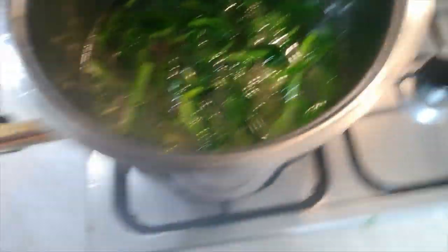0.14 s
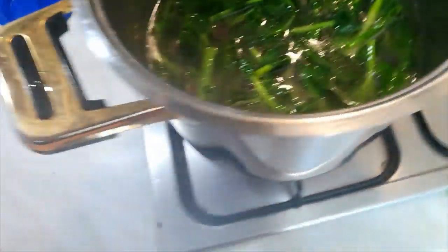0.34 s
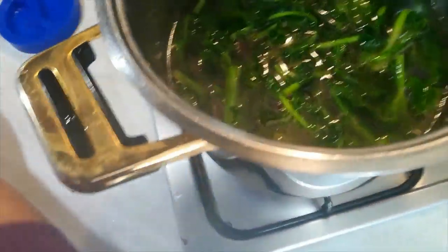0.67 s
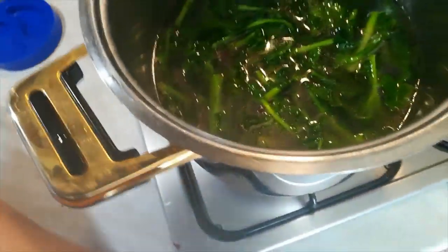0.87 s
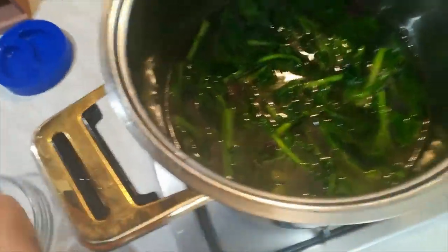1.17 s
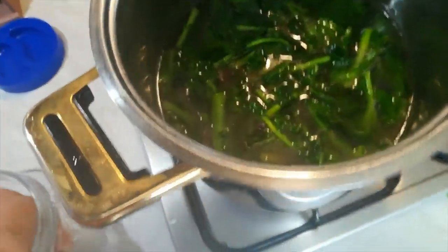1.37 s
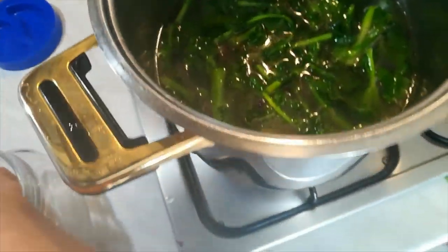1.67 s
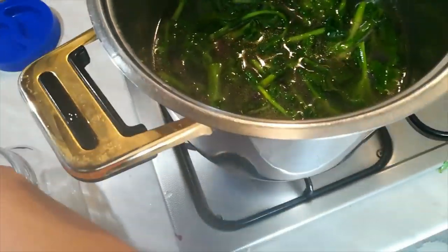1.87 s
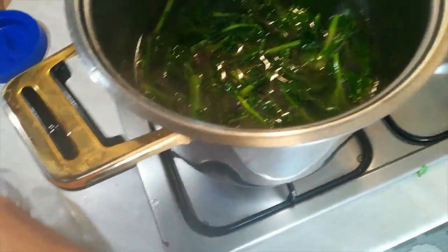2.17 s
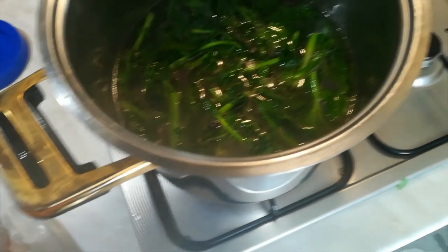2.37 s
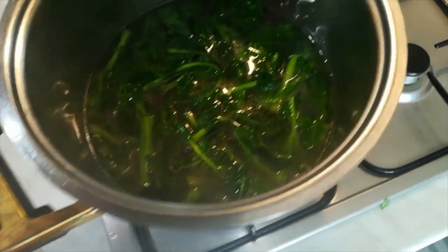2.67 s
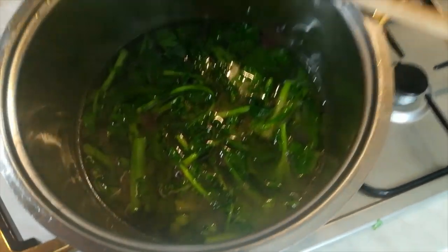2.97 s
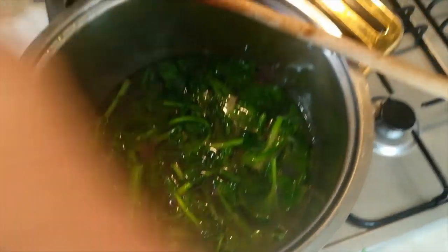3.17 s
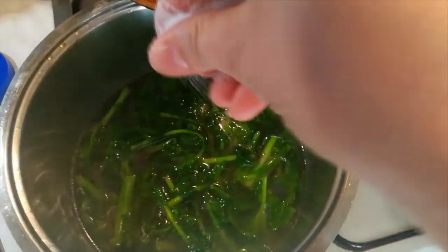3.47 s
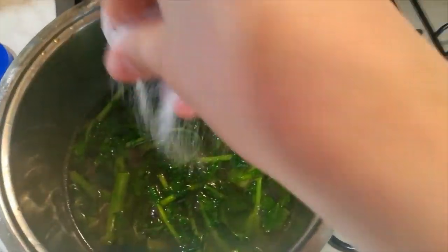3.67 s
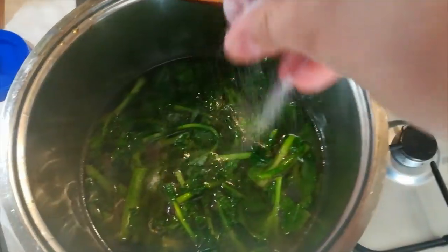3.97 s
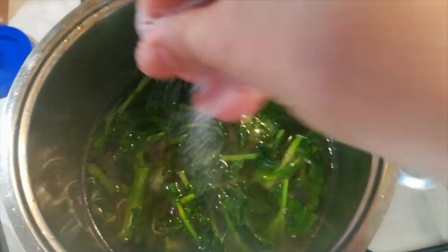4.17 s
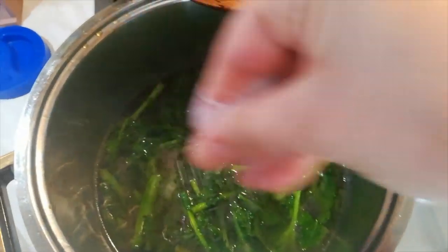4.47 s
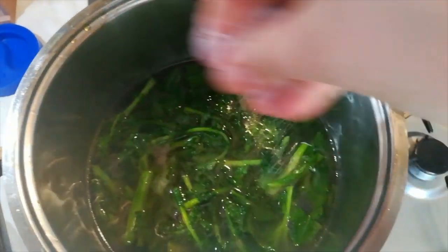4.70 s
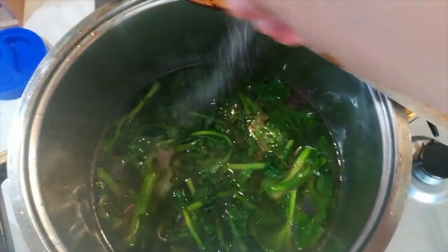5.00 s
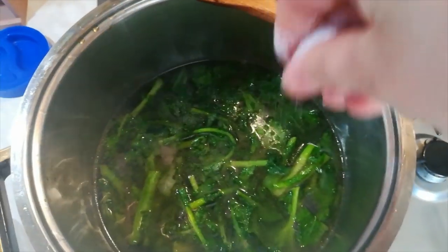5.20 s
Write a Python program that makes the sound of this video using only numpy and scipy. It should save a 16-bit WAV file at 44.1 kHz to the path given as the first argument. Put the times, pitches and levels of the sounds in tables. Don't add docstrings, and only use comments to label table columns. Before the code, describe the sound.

A quiet, small kitchen recorded close in stereo, with faint hiss and low rumble from the hand holding the camera. Near sounds come mostly from the left. Around 0.15 s, light finger ticks lead into a sharp double lid snap at 0.18 s, a short rattle and a bright, thin scrape until about 0.45. A jar bumps at 0.66, then strikes hard in a cluster at 0.75-0.84, with hollow cabinet resonance, and grates along the worktop until 1.2. Softer bumps from 1.23 to 1.36 precede another loud knock at 1.44, then small settling taps to 1.85. From 1.7 to 2.3, fingers dig faintly through salt, crisp and ringing slightly in the jar. Near silence follows until about 3.25. Then short, uneven strokes of dry, gritty hiss run to the end at 5.4, salt rubbed between fingertips, sprinkled with tiny clicks and cracking crystals, far quieter than the knocks.

```python
import sys
import numpy as np
from scipy import signal
from scipy.fft import rfft, irfft, next_fast_len
from scipy.io import wavfile
from scipy.ndimage import uniform_filter1d

SR = 44100
rng = np.random.default_rng(int(sys.argv[2]) if len(sys.argv) > 2 else 0)


def unload_audio(sound):
    columns = np.transpose(np.atleast_2d(sound))
    steps = np.round(np.clip(columns, -1, 1) * 32767)
    wavfile.write(sys.argv[1], SR, steps.astype(np.int16))


def level_to_linear(level):
    exponent = np.asarray(level, float) / 20
    return 10 ** exponent


N = 235670


def unit(x):
    return x / np.sqrt(np.mean(x ** 2) + 1e-20)


def peak(x):
    return x / np.abs(x).max()


def along(points, hz):
    f, v = np.transpose(points)
    return np.interp(np.log(hz + 1), np.log(f + 1), v)


def curve(rows):
    return np.interp(np.arange(N) / SR, *np.transpose(rows))


def bumps(peaks, hz):
    return sum(db / (1 + (2 * (hz - center) / width) ** 2) for center, width, db in peaks)


def filtered(x, response):
    m = next_fast_len(N + SR // 4, real=True)
    return irfft(rfft(x, m) * response(np.fft.rfftfreq(m, 1 / SR)), m)[..., :N]


def soft(x, edge_hz):
    return signal.sosfilt(signal.butter(3, edge_hz, fs=SR, output="sos"), x)


def struck(x, colour):
    m = next_fast_len(2 * len(x))
    cep = irfft(np.log(level_to_linear(colour(np.fft.rfftfreq(m, 1 / SR))) + 1e-4), m)
    cep[1:m // 2] *= 2
    cep[m // 2 + 1:] = 0
    return irfft(rfft(x, m) * np.exp(rfft(cep)), m)[:len(x)]


def add(track, s, sound):
    at = round(s * SR)
    track[:, at:at + sound.shape[1]] += sound[:, :N - at]


def patchy(depth_db, cavity_hz=None, cavity_db=0):
    hz, t, z = signal.stft(rng.standard_normal((2, N)), SR, nperseg=512)
    field = uniform_filter1d(rng.standard_normal(z.shape[1:]), size=3, axis=0)
    field = uniform_filter1d(field, size=12, axis=1)
    gain_db = depth_db * unit(field)
    if cavity_hz is not None:
        now = np.minimum(t * SR, N - 1).astype(int)
        cavity_width_hz = 700
        gain_db = gain_db + bumps([(cavity_hz[now], cavity_width_hz, cavity_db[now])], hz[:, None])
    return signal.istft(z * level_to_linear(gain_db), SR, nperseg=512)[1][:, :N]


GRIP = {"lid": (2000, 290), "drag": (440, 650), "scoop": (670, 230), "rub": (590, 380), "stir": (150, 830)}


def strokes(rows, action):
    start, length, db, body_db, swell_db = np.transpose(rows)[..., None]
    rise, fall = GRIP[action]
    t = np.arange(0, N + 64, 64) / SR
    shape_db = db + swell_db * (np.clip((t - start) / length, 0, 1) - .5)
    shape_db = shape_db - rise * np.maximum(start - t, 0)
    shape_db = shape_db - fall * np.maximum(t - start - length, 0)

    def total(levels_db):
        power = np.sum(level_to_linear(2 * levels_db), axis=0)
        return np.interp(np.arange(N) / SR, t, 10 * np.log10(power + 1e-14))
    return total(shape_db + body_db), total(shape_db)


# (start [s], length [s], level [dB], body over level [dB], swell [dB])
STIR = [
    (0, 5.4, -66, 0, -2.5),
    (.73, 0.081, -46.5, 0, 6.5),
    (1.25, 0.24, -50.5, 0, 4.5),
    (1.6, .5, -60, 0, -3.5),
    (3.8, 0.28, -62, 0, 1),
]
# (frequency [Hz], density [dB per Hz])
AIR = [(12, -62), (30, -13.5), (60, -12), (107, -11.5), (216, -21), (410, -12.5), (590, -18.5), (642, -23),
       (759, -16.5), (1060, -20), (2080, -19.5), (2670, -21), (5850, -25.5), (6720, -27), (7520, -26.5),
       (16000, -36)]
# (frequency [Hz], likeness [-1 to 1])
AIR_ALIKE = [(60, 0.84), (110, 0.98), (200, 0.54), (380, -0.028), (700, -0.49), (1290, 0.49), (2380, -0.33),
             (4400, 0.31), (8120, 0.01), (15000, 0.35)]


def air():
    def spread(f):
        angle = np.arccos(along(AIR_ALIKE, f)) / 2
        return level_to_linear(along(AIR, f)) * np.array([np.cos(angle), np.sin(angle)])

    def layer(level_db, depth_db, band):
        mid, side = filtered(patchy(depth_db), lambda f: band(f) * spread(f))
        return level_to_linear(level_db) * np.array([mid + side, mid - side]) / np.std(mid)
    rumble = layer(strokes(STIR, "stir")[1] - 7, 2.8, lambda f: f < 300)
    hiss = layer(-72.5, 1.3, lambda f: f >= 300)
    return rumble + hiss


# (frequency [Hz], t60 [s])
KITCHEN = [(100, 0.65), (500, 0.38), (2000, 0.1), (8000, 0.067), (16000, 0.08)]


def room(x, wet_db):
    hz, t, z = signal.stft(rng.standard_normal((2, len(x))), SR, nperseg=256)
    tail = signal.istft(z * level_to_linear(-60 * t / along(KITCHEN, hz)[:, None]), SR, nperseg=256)[1]
    wet = signal.fftconvolve(x[None], tail / np.linalg.norm(tail[0]), axes=1)[:, :len(x)]
    fade = np.minimum(1, np.linspace(8, 0, len(x)))
    return x + level_to_linear(wet_db) * wet * fade


# (frequency [Hz], difference [dB])
SHADOW = [(60, -7), (110, -19), (200, 20), (380, 10), (700, 11), (1290, 6.5), (2380, 21.5), (4400, 7.5),
          (8120, 5.5), (15000, 31.5)]
# (frequency [Hz], difference [dB])
KNOCK_SHADOW = [(60, -12), (110, 2), (200, -2.5), (380, -0.5), (700, 5.5), (1290, 10), (2380, 12),
                (4400, 1.5), (8120, 3.5), (15000, 16)]
# (frequency [Hz], likeness [0 to 1])
ALIKE = [(100, 0.51), (500, 0.84), (2000, 0.11), (5000, 0.077), (12000, 0.084)]
# (delay [s], gain [factor])
DETOURS = [(.00011, 1), (.00034, -.6), (.00073, .5), (.0013, -.35)]


def ports(pair, shadow, colour_db=lambda f: 0):
    lag_s = 27 / 44100
    delays, gains = np.transpose(DETOURS)

    def paths(f):
        half, like = level_to_linear(along(shadow, f) / 2), along(ALIKE, f)
        around = unit(gains) @ np.exp(-2j * np.pi * np.outer(delays, f)) / np.sqrt(len(DETOURS))
        direct = like / half * np.exp(-2j * np.pi * f * lag_s)
        return level_to_linear(colour_db(f)) * np.array([half, direct, np.sqrt(1 - like ** 2) / half * around])
    left, late, scatter = filtered(pair[[0, 0, 1]], paths)
    return np.array([left, late + scatter])


# (time [s], peak level [dB], frequency
# [Hz], t60 [s])
PANEL_NOTES = [(.79, -26, 222, .27), (.805, -20, 290, .04), (.785, -25, 877, .12), (1.455, -29, 830, .1),
               (1.326, -35, 152, .5), (1.794, -37, 1000, .06), (1.328, -26.5, 454, .2),
               (1.333, -31, 280, .1), (1.44, -19.5, 380, .16), (.663, -34, 235, .12), (.663, -38, 640, .08),
               (5.02, -67, 420, .2), (1.795, -39, 403, .15), (4.095, -64.5, 291, .38), (5.27, -67, 480, .2)]


def panels():
    track, t = np.zeros((2, N)), np.arange(SR // 2) / SR
    for s, db, hz, t60 in PANEL_NOTES:
        boom = level_to_linear(db - 60 * t / t60) * (1 - np.exp(-t / 0.0024)) * np.sin(2 * np.pi * hz * t)
        add(track, s, np.array([boom, boom]))
    return ports(track, KNOCK_SHADOW)


# (frequency [Hz], level [dB], t60 [s])
CABINET = [(151, 0, .8), (220, -5, .3), (381, -5, .12), (432, -3, .14), (476, -1, .2)]


def cabinet_thud(longest):
    t = np.arange(SR // 2) / SR
    thud = 0
    for hz, db, t60 in CABINET:
        strength_db = db + 1.5 * rng.standard_normal()
        thud = thud + level_to_linear(strength_db - 60 * t / min(t60, longest)) * np.sin(2 * np.pi * hz * t)
    return peak(soft(thud, 700))


def knocks(blows, tone, chatter_db):
    track, t = np.zeros((2, N)), np.arange(SR // 3) / SR
    for s, db, chatter_s, thud_db, thud_t60 in blows:
        contacts = rng.standard_normal(len(t)) * (rng.random(len(t)) < .12)
        fall_db = chatter_db - 60 * (t / chatter_s) ** 2.4
        blow = level_to_linear(fall_db) * (contacts + 0.76 * soft(contacts, 2200))
        blow[0] = 3
        add(track, s, level_to_linear(db) * room(peak(struck(blow, lambda f: tone(db, f))), wet_db=-8))
        thud = cabinet_thud(thud_t60)
        add(track, s, level_to_linear(db + thud_db) * np.array([thud, thud]))
    return ports(track, KNOCK_SHADOW)


# (time [s], peak level [dB], chatter end [s], cabinet level [dB], cabinet t60 [s])
LID_TICKS = [
    (.1405, -48.5, 0.018, -35, 0.09),
    (.1525, -44.5, .02, -46.5, .1),
]
# (time [s], peak level [dB], chatter end [s], cabinet level [dB], cabinet t60 [s])
LID_SNAPS = [
    (.1833, -12, 0.0053, -38.5, 0.2),
    (.1843, -11.5, 0.0072, -43, .2),
    (.189, -26.5, .035, -38, 0.11),
    (.215, -31.5, 0.026, -36, .1),
]
# (frequency [Hz], density [dB per Hz])
TICK_TONE = [(500, -41), (1200, -9.5), (1900, 8.5), (3000, -18.5), (9000, -41)]
# (frequency [Hz], density [dB per Hz])
SNAP_TONE = [(180, -56), (300, -23), (685, -36.5), (1000, -14), (1510, -14), (1900, -1), (3280, -9),
             (7000, -12), (8200, -5.5), (8840, -12), (15500, -33.5)]


def lid_snaps():
    ticks = knocks(LID_TICKS, lambda db, f: along(TICK_TONE, f), chatter_db=-7)
    snaps = knocks(LID_SNAPS, lambda db, f: along(SNAP_TONE, f), chatter_db=3)
    return ticks + snaps


# (frequency [Hz], density [dB per Hz])
SOFT_TONE = [(53, -34), (90, -12), (440, -2), (760, -5), (1600, -12.5), (2200, -17.5), (3300, -35),
             (7500, -36), (12000, -73.5), (18000, -120)]
# (frequency [Hz], density [dB per Hz])
HARD_TONE = [(53, -33), (90, -6), (500, -11.5), (1000, -2.5), (2500, -14), (3300, -25.5), (4150, -22.5),
             (5250, -37), (7800, -35.5), (14000, -66)]
# (frequency [Hz], width [Hz], level [dB])
BOARD = [(237.6, 20, 1.5), (385.6, 18, 8.5), (455.5, 24, 4), (623, 46, -7.5), (776, 60, 4.5), (916, 210, 3),
         (1135, 100, -6), (1266, 52, 0), (1403, 60, -9), (1630, 100, -3.5), (2130, 60, 10), (2400, 23, 6.5),
         (3430, 170, 5.5), (4100, 100, 11.5)]


def jar_tone(db, hz):
    soft_db, hard_db = -27, -14
    hard = np.clip((db - soft_db) / (hard_db - soft_db), 0, 1)
    return (1 - hard) * along(SOFT_TONE, hz) + hard * along(HARD_TONE, hz) + bumps(BOARD, hz)


# (time [s], peak level [dB], chatter end [s], cabinet level [dB], cabinet t60 [s])
JAR_KNOCKS = [(.646, -56, 0.013, 17.5, 0.085), (.6618, -24.5, 0.04, -9.5, 0.15),
              (.672, -28.5, .04, -14.5, .1), (.746, -27, 0.044, -10.5, .1), (.776, -8, 0.019, -9.5, 0.11),
              (.7838, -11.5, .025, -22, .1), (.7945, -16.5, .02, -20.5, .1), (.799, -12, 0.032, -17, 0.21),
              (.836, -22.5, .03, -19, .1), (1.231, -38, 0.015, 5, 0.39), (1.239, -36, 0.023, -5.5, 0.12),
              (1.2435, -35, 0.07, 6, 1), (1.255, -35, 0.047, -2.5, 0.27), (1.3245, -23.5, 0.07, 1.5, 0.47),
              (1.357, -33.5, .07, -5.5, .2), (1.4355, -7.5, 0.02, -20, 0.48),
              (1.4455, -13.5, 0.02, -9, 0.05), (1.456, -24, 0.028, -8, 0.075), (1.501, -32, .04, -9.5, .1),
              (1.6, -40.5, 0.094, 7.5, 0.14), (1.7918, -27.5, 0.045, -7, 0.28), (1.843, -44, .04, 4, .1)]


def jar_knocks():
    return knocks(JAR_KNOCKS, jar_tone, chatter_db=-7)


def friction(levels, hollow, tone, peaks, shadow, per_s, spread_db, patchy_db, cavity_db):
    out, cavity_hz = 0, curve(hollow)
    body_db, hiss_db = levels
    ring_db = cavity_db + 0.3 * np.maximum(hiss_db - body_db, 0)
    for level_db, colour in zip(levels, tone):
        sizes = np.minimum(rng.standard_exponential(N), 3)
        grains = (rng.random(N) < per_s / SR) * level_to_linear(spread_db * sizes)
        clumps = uniform_filter1d(grains, size=24)
        pair = patchy(patchy_db, cavity_hz, ring_db) * np.sqrt(1 + np.abs(clumps) / np.mean(clumps))
        sound = ports(pair, shadow, lambda f: along(colour, f) + bumps(peaks, f))
        out = out + level_to_linear(level_db) * sound / np.std(sound.mean(axis=0))
    return out


# (start [s], length [s], hiss level [dB], body over hiss [dB], swell [dB])
LID = [
    (0, 0.0095, -71.5, 6.5, -0.5),
    (.152, 0.028, -66, 13.5, 6),
    (.19, 0.052, -44.5, 2, -5),
    (.27, 0.17, -50, -1, -2),
    (.5, 0.14, -68, 2.5, 0.5),
]
# (time [s], cavity frequency [Hz])
LID_HOLLOW = [(.1, 4320), (.25, 5100), (.4, 6290), (.59, 4660)]
# (frequency [Hz], density [dB per Hz])
LID_TONE = [
    [(120, -55), (200, -23), (404, -15.5), (628, -20), (1080, -11), (1330, -16.5), (2230, -9.5), (3000, -25.5), (3900, -43), (6600, -120)],
    [(1650, -34), (2800, 0), (4340, 4), (5480, 1), (6620, -0.5), (7890, 2.5), (14900, -20.5), (16000, -37)],
]


def lid_sliding():
    return friction(strokes(LID, "lid"), LID_HOLLOW, LID_TONE, [], KNOCK_SHADOW,
                    per_s=14000, spread_db=0.5, patchy_db=1.44, cavity_db=2.0)


# (start [s], length [s], hiss level [dB], body over hiss [dB], swell [dB])
DRAG = [(.715, .03, -62, 13.7, 6.5), (.745, 0.045, -47.5, 6.3, 3), (.81, 0.07, -48, 9.2, 1),
        (.905, .19, -44.5, 2.3, -2.5), (1.11, 0.095, -49, 3.2, -6.5), (1.21, 0.09, -66.5, 11, -11.5),
        (1.335, 0.059, -69.5, 12, -10.5), (1.44, 0.068, -62, 16, 0.5), (1.52, 0.15, -76.5, 18.8, -19.5)]
# (time [s], cavity frequency [Hz])
DRAG_HOLLOW = [(.7, 7145), (1.2, 7130)]
# (frequency [Hz], density [dB per Hz])
DRAG_TONE = [
    [(41, -63), (70, -22), (224, 1), (643, 1.5), (706, 13.5), (880, -3), (1030, 5), (1110, -3), (2300, -1.5), (3000, -16.5), (3900, -31.5), (6600, -120)],
    [(1650, -42), (2800, -16), (3800, -10), (4120, -12.5), (5240, -15), (6570, -15), (7490, -10), (9960, -21), (14800, -35.5), (16000, -37)],
]
# (frequency [Hz], width [Hz], level [dB])
JAR = [(153, 22, 16.5), (222.4, 16, 7.5), (406, 29, 3.5), (430, 20, 6.5), (610, 160, -6), (4100, 84, 12.5),
       (4500, 140, 7.5), (7656, 440, 0), (8985, 100, -3.5)]


def jar_dragging():
    return friction(strokes(DRAG, "drag"), DRAG_HOLLOW, DRAG_TONE, JAR, KNOCK_SHADOW,
                    per_s=13000, spread_db=-13.5, patchy_db=1.83, cavity_db=4.5)


# (start [s], length [s], hiss level [dB], body over hiss [dB], swell [dB])
SCOOP = [(1.58, 0.68, -75, -4, -6), (1.58, .08, -76, 7, -3), (1.69, 0.052, -65.5, -6.5, 0),
         (1.815, 0.0088, -74, 16, -22), (1.82, 0.11, -61, -2.5, 1.5), (1.99, 0.11, -63, -1.5, -2),
         (2.05, 0.089, -73, 16, 5), (2.19, 0.044, -66.5, -2, -2.5), (2.27, 0.057, -79.5, -14, 3)]
# (time [s], cavity frequency [Hz])
SCOOP_HOLLOW = [(1.6, 4100), (2.3, 4200)]
# (frequency [Hz], density [dB per Hz])
SCOOP_TONE = [
    [(71, -40), (120, -13), (147, -3.5), (474, -8.5), (655, -10.5), (823, -6.5), (1400, -10), (2050, -7), (3000, -21.5), (3900, -48), (6600, -120)],
    [(1650, -44), (2800, -39), (3190, -7.5), (3970, -6.5), (4560, -5.5), (4730, -11.5), (8300, 0.5), (9820, -13), (14600, -22.5), (16000, -36)],
]
# (frequency [Hz], width [Hz], level [dB])
JAR_OPEN = [(4020, 110, 10), (4480, 56, 4.5), (4860, 60, 11), (5590, 190, 11.5), (7360, 140, 9.5),
            (7650, 110, 0), (8350, 220, 3.5)]


def salt_digging():
    return friction(strokes(SCOOP, "scoop"), SCOOP_HOLLOW, SCOOP_TONE, JAR_OPEN, KNOCK_SHADOW,
                    per_s=3100, spread_db=-1.0, patchy_db=2.5, cavity_db=8.5)


# (time [s], peak level [dB], ring frequency [Hz], t60 [s])
LUMPS = [(1.6985, -52, 4660, 0.045), (2.332, -61, 4470, 0.03), (2.9228, -60, 6790, 0.012),
         (3.2799, -63, 2300, 0.034), (3.275, -67, 5000, .05), (3.3, -62, 5050, .05), (1.87, -55, 4480, .05),
         (2.224, -59, 4400, 0.057), (3.4161, -49.5, 2180, 0.017), (3.936, -42.5, 2030, 0.018),
         (3.9464, -50.5, 1920, 0.034), (4.0287, -51, 1910, 0.029), (4.0547, -47.5, 1924, 0.016),
         (4.2035, -58, 5230, 0.021), (4.2328, -43, 5060, 0.07), (4.5989, -59, 4500, 0.024),
         (5.0514, -51, 1940, 0.024), (5.1851, -61.5, 1850, 0.037), (5.2465, -50.5, 1890, 0.022),
         (5.2994, -47, 6500, 0.026)]
# (time [s], peak level [dB], ring frequency [Hz], t60 [s])
MURMURS = [
    (5.08, -58, 86, .1),
    (1.7, -60, 3400, .052),
    (4.03, -66, 1270, .12),
]
# (time [s], peak level [dB], ring frequency [Hz], t60 [s])
TRICKLE = [(s, -57, 9600, .0014) for s in (4.096, 4.109, 4.121, 4.134)]


def lumps():
    track, t = np.zeros((2, N)), np.arange(SR // 5) / SR
    for s, db, hz, t60 in LUMPS + MURMURS + TRICKLE:
        tick = level_to_linear(-60 * t / t60) * (1 - np.exp(-t / 0.00066)) * np.sin(2 * np.pi * hz * t)
        add(track, s, level_to_linear(db - 2.5) * room(peak(tick), wet_db=0.5))
    return ports(track, SHADOW)


# (time [s], peak level [dB])
CRACKS = [(2.9226, -60), (3.35, -55.5), (3.4525, -47), (3.499, -54.5), (3.527, -49.5), (3.658, -53.5),
          (4.006, -54.5), (4.2035, -51), (4.236, -53), (4.599, -58.5), (4.641, -51.5), (4.652, -51),
          (4.691, -53), (5.045, -51.5), (5.088, -53), (5.2995, -51.5), (5.306, -52.5), (1.6985, -55.5)]
# (frequency [Hz], density [dB per Hz])
CRACK_TONE = [(800, -33), (1900, -2), (3000, -3), (5000, 2.5), (9000, -6.5), (15000, -18)]


def cracks():
    track, t = np.zeros((2, N)), np.arange(SR // 10) / SR
    t60 = .006
    for s, db in CRACKS:
        noise = level_to_linear(-60 * t / t60) * rng.standard_normal(len(t))
        burst = struck(noise, lambda f: along(CRACK_TONE, f))
        add(track, s, level_to_linear(db) * room(peak(burst), wet_db=-7.5))
    return ports(track, SHADOW)


# (start [s], length [s], hiss level [dB], body over hiss [dB], swell [dB])
RUB = [(2.62, 0.38, -91.5, 11, 1), (3.27, 2.2, -74, -7.5, 4), (3.24, 0.086, -76, 8.5, 11),
       (3.335, 0.027, -67.5, 4.5, 4), (3.385, 0.026, -59.5, 1.5, 5), (3.44, 0.032, -63, 0.5, -1.5),
       (3.49, 0.05, -58, 1.5, 7.5), (3.59, 0.06, -58, -3, 4.5), (3.73, 0.049, -60, -3.5, -3.5),
       (3.82, 0.093, -58, -5, 3), (3.925, 0.04, -62.5, -2, -4), (3.99, .07, -61, -2, 5),
       (4.09, 0.046, -73, 2, -7), (4.205, .03, -58, -6, 2.5), (4.235, 0.026, -54, -11, 0),
       (4.28, 0.056, -57.5, -5, -5), (4.405, 0.083, -55.5, -13, 3), (4.6, 0.046, -59, -11.5, 5),
       (4.675, 0.038, -57.5, -8.5, -1), (4.795, 0.035, -62.5, -5.5, 3), (4.89, 0.15, -59, -4, 8),
       (5.065, 0.014, -58, 1.5, -3), (5.2, 0.07, -63.5, -23, 5), (5.29, 0.013, -61, -16, 5),
       (5.31, .04, -70, -6, -3)]
# (time [s], cavity frequency [Hz])
HAND_HOLLOW = [(3.3, 4800), (3.93, 5120), (4.03, 7580), (4.15, 5000), (4.2, 4740), (4.48, 5180),
               (4.6, 4670), (4.66, 4580), (4.7, 4100), (4.8, 5030), (5.07, 4500), (5.2, 5980), (5.3, 6600)]
# (frequency [Hz], density [dB per Hz])
RUB_TONE = [
    [(650, -21), (1100, -18), (1240, -19.5), (1420, -15), (1600, -22), (1960, 0.5), (2300, 0.5), (2700, -11.5), (2900, -45), (3770, -82), (6380, -120)],
    [(1590, -13.5), (2700, -6.5), (3640, -4), (5050, -2.5), (5770, -3), (7770, -1.5), (11200, -10), (15100, -29), (16000, -46)],
]
# (frequency [Hz], width [Hz], level [dB])
HAND = [(3004, 430, 4), (4250, 810, 4), (5000, 170, 2), (7760, 240, 5), (9390, 230, 2.5)]


def salt_rubbing():
    return friction(strokes(RUB, "rub"), HAND_HOLLOW, RUB_TONE, HAND, SHADOW,
                    per_s=1500, spread_db=2.5, patchy_db=1.5, cavity_db=5)


def scene():
    background = air()
    blows = lid_snaps() + jar_knocks() + panels()
    frictions = lid_sliding() + jar_dragging() + salt_digging() + salt_rubbing()
    near = blows + frictions + lumps() + cracks()
    return filtered(near, lambda f: (1j * f / (60 + 1j * f)) ** 5) + background


def band_limit(x):
    return signal.sosfilt(signal.butter(12, 16470, fs=SR, output="sos"), x)


def record(dry):
    top_hz = 15800
    mix = filtered(dry, lambda f: f < top_hz)
    return band_limit(mix)


dry = scene()
out = record(dry)
unload_audio(out)
```